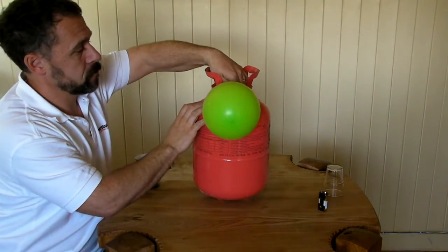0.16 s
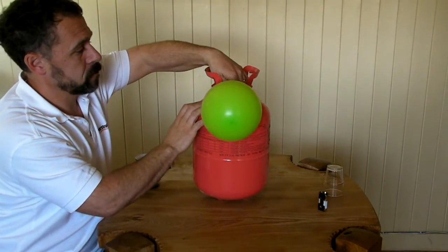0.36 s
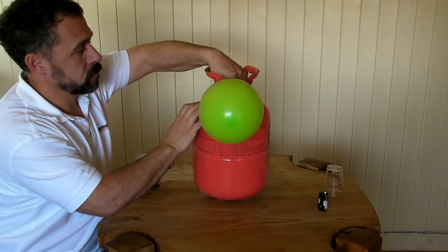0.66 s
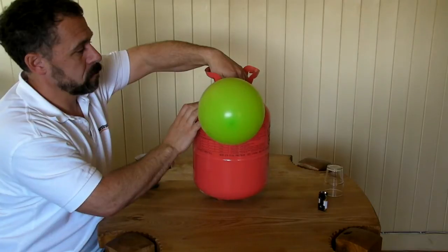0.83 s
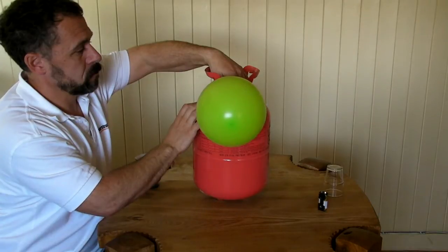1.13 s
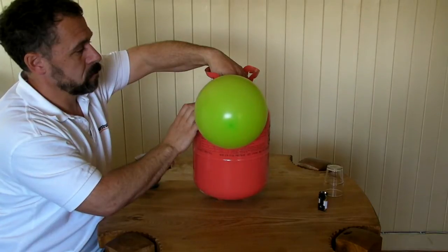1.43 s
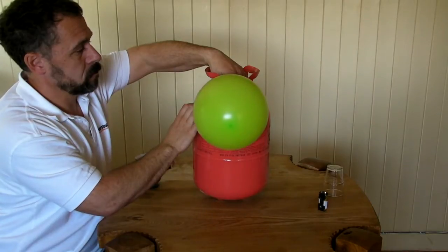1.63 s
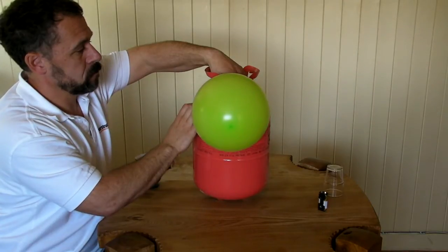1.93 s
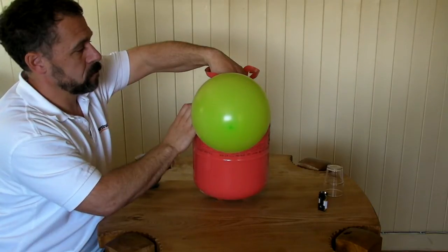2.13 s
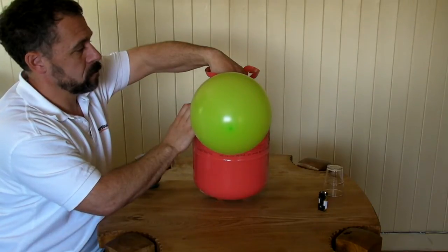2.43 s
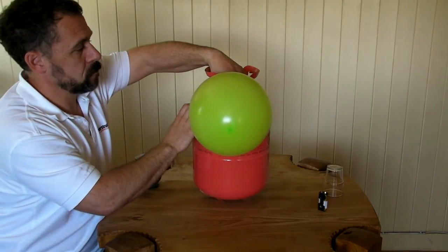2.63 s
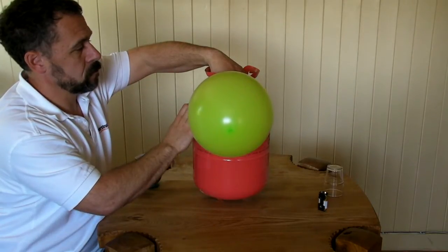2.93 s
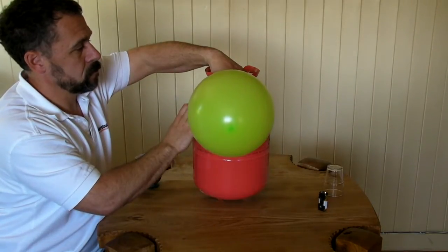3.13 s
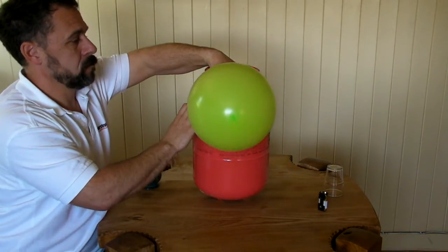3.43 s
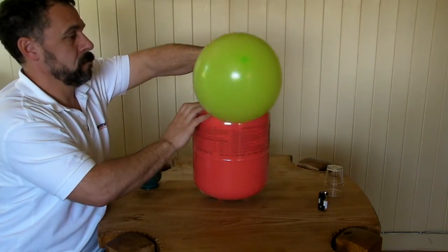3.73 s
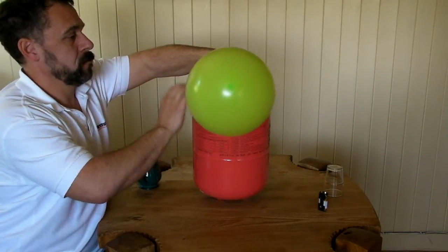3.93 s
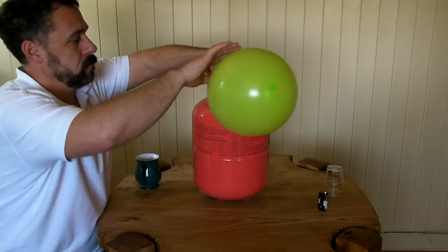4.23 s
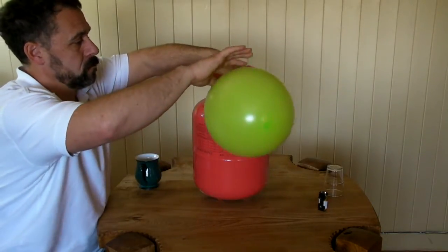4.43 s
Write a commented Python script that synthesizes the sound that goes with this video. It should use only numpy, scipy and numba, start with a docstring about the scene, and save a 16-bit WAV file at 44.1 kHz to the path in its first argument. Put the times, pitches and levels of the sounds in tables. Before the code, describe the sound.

Close in a small indoor room, gas rushes from a canister into a latex balloon: a broad, bright hiss with a thin high whistle, low fluttering and slowly sinking resonances. After nearly four seconds it cuts off. Quiet rubbery creaks, papery hand brushing and a soft hollow pat follow, then the valve begins hissing again. Faint microphone hiss lies underneath.

```python
"""In a small room, gas from a canister valve fills a latex balloon: a broad jet hiss with a thin whistle band,
a low flutter and a rumble, all made of coloured noise. The hiss rings the gas inside the balloon, whose modes
(resonances) sink as it swells. The valve shuts, the latex creaks in soft pops made of short bumps, a hand
brushes the skin as grainy noise and pats it as a drum tone, and the valve opens again. Microphones hiss faintly."""
import sys
import numpy as np
from scipy import signal
from scipy.fft import rfft, irfft
from scipy.io import wavfile
from scipy.ndimage import uniform_filter1d, map_coordinates
from numba import njit

SR = 44100
rng = np.random.default_rng(int(sys.argv[2]) if len(sys.argv) > 2 else 0)


def gain_from_db(level_db):
    """Turn a decibel level (scalar or array-like) into a linear amplitude factor."""
    decades = np.asarray(level_db, float) / 20
    return 10 ** decades


def store_wav(level_fs):
    """Save 16-bit WAV to argv[1]."""
    pcm = np.round(np.clip(np.atleast_2d(level_fs), -1, 1) * 32767)
    wavfile.write(sys.argv[1], SR, pcm.T.astype(np.int16))


N = 202307
TIME = np.arange(N) / SR  # seconds
FREQ = np.maximum(np.fft.rfftfreq(N, 1 / SR), 1)  # Hz
FULL_DB = -30  # flow level that counts as a fully open valve


def shape(table):
    """Turns points of (Hz, dB) into a gain for every frequency, nearly silent below the first point."""
    hz, db = np.transpose(table)
    return gain_from_db(np.interp(np.log(FREQ), np.log(hz), db, left=-100))


def noise(gain, channels=2):
    """Makes unrelated noises of one colour, with an overall rms of 1."""
    x = irfft(rfft(rng.standard_normal((channels, N))) * gain, N)
    return x / np.sqrt(np.mean(x ** 2))


def walk(rate):
    """Wanders at random: draws a level `rate` times a second, holds it and smooths it twice."""
    k = int(SR / rate)
    steps = np.repeat(rng.standard_normal(N // k + 1), k)
    return uniform_filter1d(uniform_filter1d(steps, k), k)[:N]


@njit
def svf(x, hz, width):
    """Band-pass filter (state variable type) with a moving centre, where its gain is 1."""
    y, band, low = np.empty(len(x)), 0., 0.
    for i in range(len(x)):
        g, k = np.tan(np.pi * hz[i] / SR), width / hz[i]
        v = (band + g * (x[i] - low)) / (1 + g * (g + k))
        band, low, y[i] = 2 * v - band, low + 2 * g * v, k * v
    return y


def band_pass(x, centre, width):
    """Runs the moving band-pass on each channel."""
    return np.array([svf(channel, centre, float(width)) for channel in x])


def stereo(mid, side):
    """Left is mid plus side, right is mid minus side."""
    return np.array([mid + side, mid - side])


def whistle(flow):
    """A band of hiss around a strong core; it narrows to the core when the valve is nearly shut."""
    # Colour of the whistle. Each row: frequency in Hz, relative level in dB per Hz.
    colour = [(4710, -44), (8000, -13), (8480, -9.5), (9210, -7.5), (10600, 1.5), (11000, 0), (12700, -9.5),
              (15500, -15)]
    level_db, core_hz, core_width_hz = -2, 10700, 3400
    skirt_loss = 0.29  # dB lost around the core per dB of flow under full
    band = noise(shape(colour))
    core = band_pass(band, np.full(N, float(core_hz)), core_width_hz)
    skirt = gain_from_db(skirt_loss * np.minimum(flow - FULL_DB, 0)) * (band - core)
    return gain_from_db(level_db + 1.1 * walk(8.67)) * (core + skirt)


def standing_waves(x):
    """Adds narrow peaks to an even response; each wavers and drifts as the balloon and hands move."""
    # Strongest standing waves between canister, table and walls.
    # Each row: frequency in Hz, strength in dB before the shared offset below.
    waves = [(363, -1), (425, 5), (527, 7), (670, 1.5), (872, 3), (907, 3), (1036, -3), (1203, 3),
             (1324, 0), (1466, 5), (1666, 6), (1919, -2.5), (1948, -9), (2026, -5), (2123, 1), (2239, 6),
             (2411, 3), (2489, 8), (2608, 5), (2672, 4), (2818, -6), (3009, 0), (3283, -8), (3474, -4.5),
             (3571, -5), (3790, 2), (3948, 0), (4072, 3), (4495, -2)]
    offset_db, width_hz, waver_db, drift_hz = -3, 22, 4.5, 5
    out = x.copy()
    for hz, db in waves:
        gain = gain_from_db(db + offset_db + waver_db * walk(4.07))
        centre = hz + drift_hz * walk(1.36)
        out += gain * band_pass(x, centre, width_hz)
    return out


def balloon(x):
    """Gas modes ring with the hiss; each sinks as the volume grows, wavers, and cancels against the next."""
    # Gas modes. Each row: frequency at the start in Hz, width in Hz, strength in dB before the
    # changes below, power of the volume by which the pitch sinks.
    modes = [(4250, 450, -1, .40), (6400, 380, 1.5, .375), (8300, 380, 3, .37), (9950, 380, 3, .35),
             (11250, 400, 1, .31), (13100, 400, 2, .335), (14850, 420, 1, .345), (16500, 440, 0, .345),
             (18000, 500, -2, .34), (19300, 550, -4, .335)]
    fill_rate, fill_sag, fill_end_s = .76, .04, 3.7  # volume per s re the start, its slowing, end of filling
    ring_start_db, ring_sag_db_per_s = 4.5, 3.2  # the modes weaken as the balloon grows
    leak_hz, leak_db_per_octave = 4400, 15  # modes that sink under this pitch fade
    dip_depth, dip_width_hz, dip_fade_s, dip_full_hz = .62, 520, 1.5, 7500  # shallower under dip_full_hz
    filled = np.minimum(TIME, fill_end_s)
    volume = 1 + (fill_rate - fill_sag * filled) * filled
    ring_db = ring_start_db - ring_sag_db_per_s * filled
    out, centres = x.copy(), []
    for hz, width, db, power in modes:
        centre = np.minimum(hz * volume ** -power, .45 * SR)
        leak_db = leak_db_per_octave * np.minimum(np.log2(centre / leak_hz), 0)
        gain = gain_from_db(db + ring_db + leak_db + 1.5 * walk(6))
        out += gain * band_pass(x, centre, width)
        centres.append(centre)
    # neighbouring modes cancel halfway between them, less and less as the balloon grows
    depth = dip_depth * np.exp(-filled / dip_fade_s)
    for lower, upper in zip(centres, centres[1:]):
        between = (lower + upper) / 2
        dip = depth * np.minimum(between / dip_full_hz, 1) ** 2
        out = out - dip * band_pass(out, between, dip_width_hz)
    return out


def room(x):
    """Direct sound plus a diffuse tail, which combs a steady hiss into fine lines that come and go."""
    # Colour of the tail. Each row: frequency in Hz, level in dB compared with the direct sound.
    tail_colour = [(150, -12), (3800, -9), (4500, -6), (11000, -5), (15000, -10)]
    t60_s = 0.25  # time to fade by 60 dB
    drift_s, drift_per_s = 4e-5, 1.2  # paths to the walls change as the balloon swells and sways
    tail = rng.standard_normal(x.shape) * gain_from_db(-60 * TIME / t60_s) * (TIME > .003)
    tail /= np.sqrt(np.mean(np.sum(tail ** 2, axis=1)))
    wet = shape(tail_colour)
    direct = rfft(x) / np.sqrt(1 + wet ** 2)  # keeps the total power even
    echoes = irfft(direct * wet * rfft(tail), N)
    late = (TIME - drift_s * walk(drift_per_s)) * SR
    diffuse = [map_coordinates(channel, [late], mode="mirror") for channel in echoes]
    return irfft(direct, N) + diffuse


def valve():
    """Jet, whistle, neck flutter and rumble follow the gas flow; each flickers a little on its own."""
    # Flow through the valve, which shuts and opens again. Each row: time in seconds, level in dB.
    flow_points = [(0, -35), (.8, -31), (1.4, -31), (1.75, -30.5), (2, -31), (2.6, -32.5), (3.1, -32.5),
                   (3.4, -32.5), (3.5, -33.5), (3.58, -35), (3.67, -39), (3.76, -49), (3.9, -81),
                   (4.465, -77), (4.485, -53), (4.51, -49), (4.525, -46), (4.565, -40.5), (4.59, -37)]
    # Colours of jet, flutter and rumble. Each row: frequency in Hz, relative level in dB per Hz.
    jet_colour = [(250, -53), (370, -24.5), (430, -6.5), (463, -6.5), (787, -3.5), (890, -3.5),
                  (1100, -2.5), (2160, 0), (3170, -3.5), (6020, -4.5), (7810, -10.5), (8200, -7),
                  (10700, -14), (18000, -120)]
    flutter_colour = [(120, -37), (190, -23), (215, -7.5), (238, -5), (290, -14), (335, 0), (375, -1.5),
                      (420, -10), (480, -12), (700, -28.5)]
    rumble_colour = [(12, -44), (20, -23), (54, -16.5), (108, -8), (170, -10.5), (220, -35), (370, -120)]
    # Stereo width of the gas sound. Each row: frequency in Hz, side compared with mid in dB.
    side_colour = [(20, -8), (200, -16), (380, -23.5), (700, -20), (1290, -29.5), (2380, -14.5),
                   (4400, -15.5), (8120, -8.5), (15000, -1.5)]
    # The neck slackens and puffs. Each row: middle in seconds, dB added to the flutter, half length in seconds.
    puffs = [(0.574, 5.5, 0.061), (1.07, 4, 0.033), (1.45, 3.5, 0.15), (1.84, 5.5, 0.072),
             (2.215, 13.5, 0.065), (2.407, -2, 0.033), (2.858, 13.5, 0.047), (3.21, 13, 0.11),
             (3.437, 13, 0.08)]
    jet_db, jet_sag_db_per_s = 2.5, 1.0048  # sags as the canister empties
    surge_db, surge_s = 4.5, 0.17  # early surge and its decay time
    shut_loss = 0.2  # dB of jet lost per dB of flow under full
    reopen_s, reopen_loss = 4.2, 0.78  # the same through the barely reopened valve, from reopen_s
    flutter_db, flutter_sag_db_per_s, flutter_least_db = -9, 7.5, -29.5  # sags as the neck tightens
    rumble_db, rumble_hold_s, rumble_sag_db_per_s, rumble_least_db = -32, 1.55, 14, -42.5  # holds, then sags

    times, levels = np.transpose(flow_points)
    flow = np.interp(TIME, times, levels)
    jet = jet_db - jet_sag_db_per_s * TIME + surge_db * np.exp(-TIME / surge_s)
    jet = jet + shut_loss * np.minimum(flow - FULL_DB, 0)
    jet = np.where(TIME > reopen_s, reopen_loss * (flow - FULL_DB), jet)
    puff = sum(db * np.maximum(1 - np.abs(TIME - s) / half, 0) for s, db, half in puffs)
    flutter = np.maximum(flutter_db - flutter_sag_db_per_s * TIME, flutter_least_db) + puff

    gas = gain_from_db(jet + .45 * walk(12)) * noise(shape(jet_colour))
    gas += gain_from_db(flutter + 2.6 * walk(20)) * noise(shape(flutter_colour))
    gas = standing_waves(gas)
    gas += whistle(flow)
    mid, side = room(balloon(gain_from_db(flow) * gas))
    side = irfft(rfft(side) * shape(side_colour), N)

    # the rumble shares part of the puffs and differs between left and right
    sag = rumble_sag_db_per_s * np.maximum(TIME - rumble_hold_s, 0)
    rumble = np.maximum(rumble_db - sag, rumble_least_db) + .7 * puff
    deep = gain_from_db(flow + rumble + 3 * walk(16)) * noise(shape(rumble_colour))
    return stereo(mid + deep[0], side + .5 * deep[1])


def microphone_hiss():
    """The two microphones add a steady, faint coloured noise of their own."""
    # Colour of the hiss. Each row: frequency in Hz, relative level in dB per Hz.
    colour = [(25, -45), (60, -13), (150, -13.5), (300, -5), (500, -3), (2130, -7.5), (4090, -7.5),
              (4910, -14), (15500, -23)]
    mid, side = gain_from_db(-52.5) * noise(shape(colour))
    return stereo(mid, gain_from_db(-1.0) * side)


def creaks():
    """Stretched latex slips in short pressure bumps, some more to the left, some more to the right."""
    # Loudest creaks. Each row: middle in seconds, peak in dB before panning and filtering,
    # length at half height in milliseconds.
    loud_creaks = [(3.678, -46, 2.1), (3.702, -44, 2), (3.736, -45, 2.1), (3.764, -46, 2),
                   (3.779, -45, 1.3), (3.798, -47, 1.4), (3.828, -41, 1.8), (3.838, -42, 1),
                   (3.847, -39, 1.1), (3.863, -43, 1.2), (3.886, -40, 1), (3.896, -48, 1.8),
                   (3.907, -45, 2.2), (3.939, -46, 1.6), (3.985, -43, 1.8), (4.015, -41, 2.1),
                   (4.03, -47, 1.5), (4.055, -43, 1.5), (4.067, -45, 2.5), (4.133, -44, 1.8),
                   (4.211, -42, 2.6), (4.223, -42, 1.2), (4.236, -42, 1.3), (4.276, -41, 2.5),
                   (4.286, -45, 2.5), (4.303, -40, 1.7), (4.325, -46, 2.4), (4.346, -46, 2.3),
                   (4.378, -46, 2.4), (4.403, -45, 1.8), (4.413, -45, 1.9), (4.453, -46, 2.3),
                   (4.459, -41, 2), (4.469, -41, 3.9), (4.479, -39, 1.4), (4.49, -40, 1.3)]
    from_s, span_s, least_db, range_db = 3.64, .94, -58, 8  # the many faint ones
    faint = [(from_s + span_s * u, least_db + range_db * v, 1.0 + 1.4 * w)
             for u, v, w in rng.random((80, 3))]
    rows = list(loud_creaks) + faint
    shares = 0.27 * rng.standard_normal(len(rows))  # lean to the left (above 0) or right
    out = np.zeros((2, N))
    for (s, db, ms), share in zip(rows, shares):
        bump = gain_from_db(db) * np.hanning(max(int(2 * ms * SR / 1000), 4))
        i = int(s * SR) - len(bump) // 2
        out[:, i:i + len(bump)] += np.outer([1 + share, 1 - share], bump)
    return signal.sosfilt(signal.butter(1, 70., "highpass", fs=SR, output="sos"), out)


def brush():
    """A hand drags over latex: grainy noise, drum-like below and papery above, that rises, holds and fades."""
    # Strokes. Each row: start in seconds, peak level in dB, hold in seconds, treble compared with bass in dB.
    strokes = [(4.217, -41.5, 0.018, -4.5), (4.242, -49.5, 0.019, 3), (4.275, -53, .022, 0.5),
               (4.308, -58.5, 0.13, -6), (4.465, -46, 0.008, -2), (4.478, -44.5, 0.034, -3.5),
               (4.556, -47.5, .05, 5.5)]
    # Colours of bass and treble. Each row: frequency in Hz, relative level in dB per Hz.
    bass_colour = [(35, -37), (60, -6), (206, -11), (400, -7), (684, -4), (790, -6), (900, -3), (1130, -13),
                   (1400, -11.5), (2000, -14), (2600, -39), (4400, -120)]
    treble_colour = [(940, -23), (1600, -5), (2910, -9.5), (3380, -19), (3970, -12), (15000, -32)]
    attack_s, fall_db_per_s = 0.0076, 300
    bass, treble = np.zeros((2, N))
    for s, db, hold, treble_db in strokes:
        fade = fall_db_per_s * np.maximum(TIME - s - attack_s - hold, 0)
        stroke = gain_from_db(db - fade) * np.clip((TIME - s) / attack_s, 0, 1) ** 2
        # overlapping strokes add as powers
        bass = np.hypot(bass, stroke)
        treble = np.hypot(treble, gain_from_db(treble_db) * stroke)
    grain = gain_from_db(2.2 * walk(200))
    skin = bass * noise(shape(bass_colour)) + treble * noise(shape(treble_colour))
    mid, side = grain * skin
    return stereo(mid, gain_from_db(-20) * side)


def pats():
    """Each pat of the hand rings the low drum tone of the balloon, which dies away."""
    # Pats. Each row: start in seconds, strength in dB before the soft attack.
    hits = [(4.447, -50), (4.501, -40)]
    drum_hz, drum_t60_s, attack_s = 210, 0.2, .003
    tone = np.zeros(N)
    for s, db in hits:
        t = np.maximum(TIME - s, 0)
        level = gain_from_db(db - 60 * t / drum_t60_s) * (1 - np.exp(-t / attack_s))
        tone += level * np.sin(2 * np.pi * drum_hz * t)
    return stereo(tone, .1 * tone)


def scene():
    """Adds all sources together."""
    return valve() + microphone_hiss() + creaks() + brush() + pats()


def roll_off(x):
    """The treble ends steeply here."""
    return signal.sosfilt(signal.butter(12, 15660, fs=SR, output="sos"), x)


def record(dry):
    """A filter cuts a narrow notch in the treble of the finished mix."""
    notch_hz, notch_width_hz = 7950, 430
    b, a = signal.iirnotch(notch_hz, notch_hz / notch_width_hz, SR)
    mix = signal.lfilter(b, a, dry)
    return roll_off(mix)


dry = scene()
out = record(dry)
store_wav(out)
```